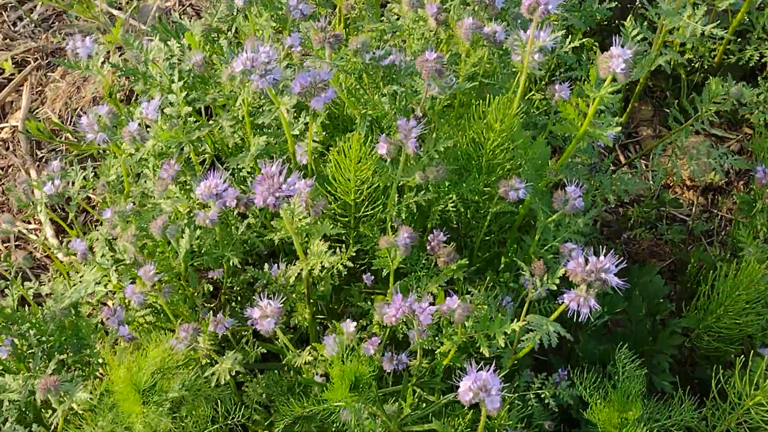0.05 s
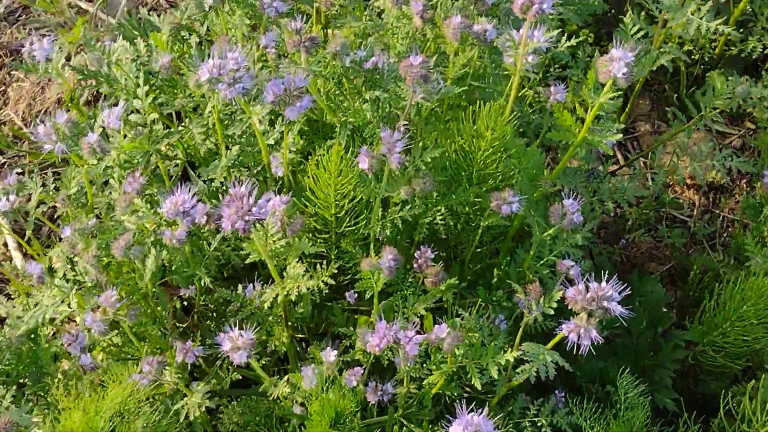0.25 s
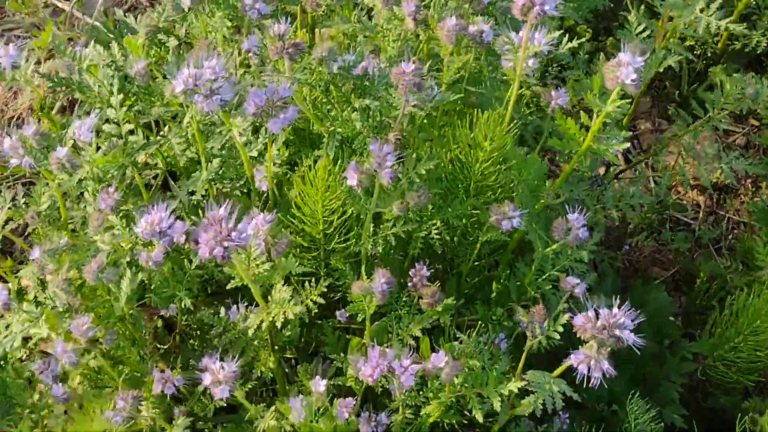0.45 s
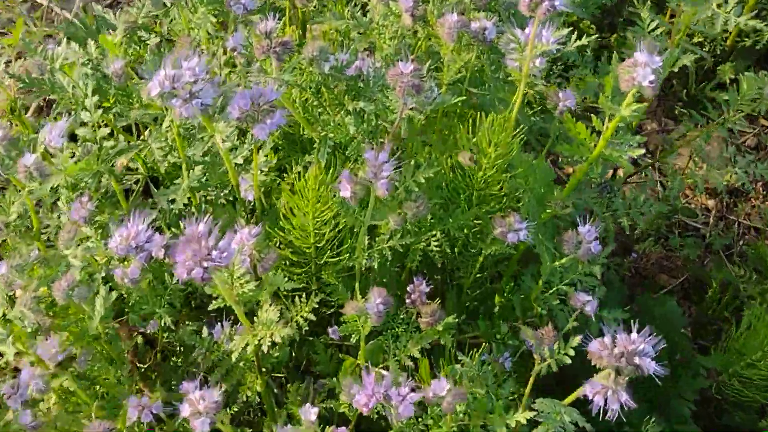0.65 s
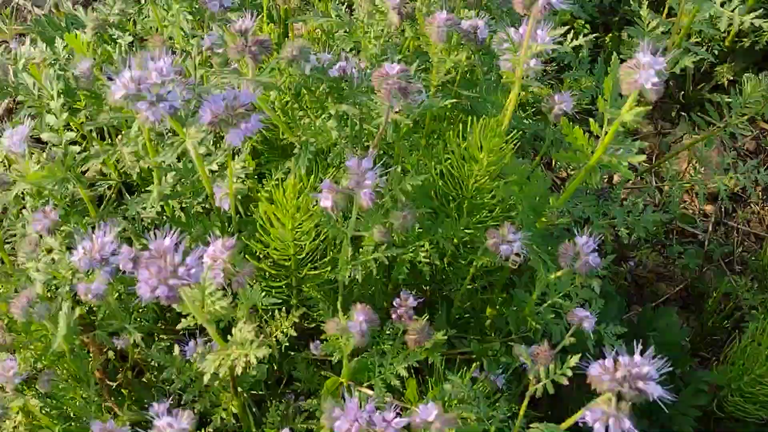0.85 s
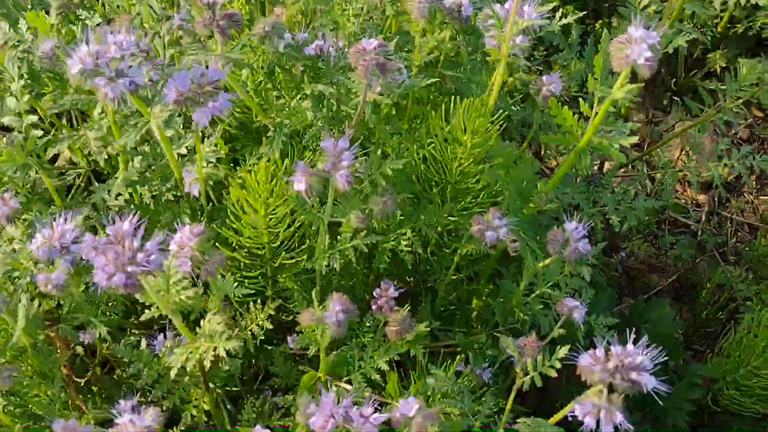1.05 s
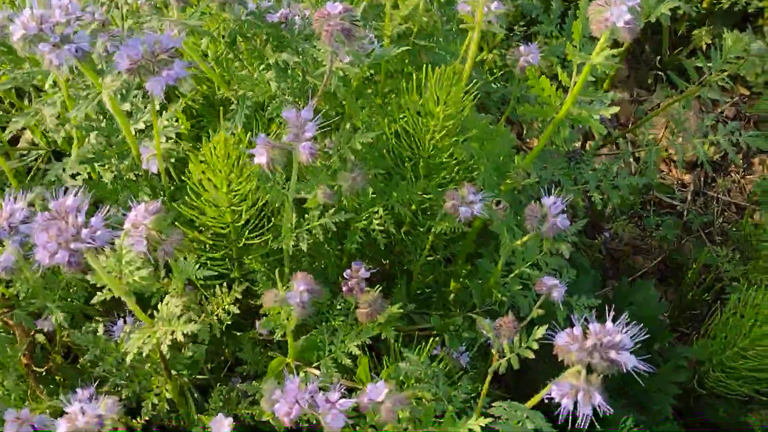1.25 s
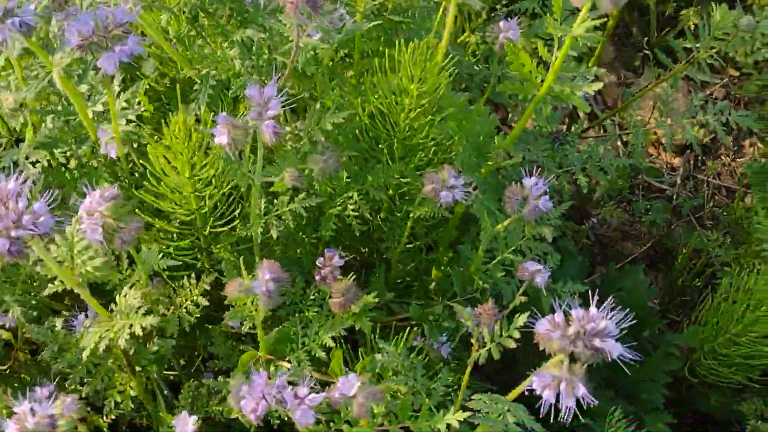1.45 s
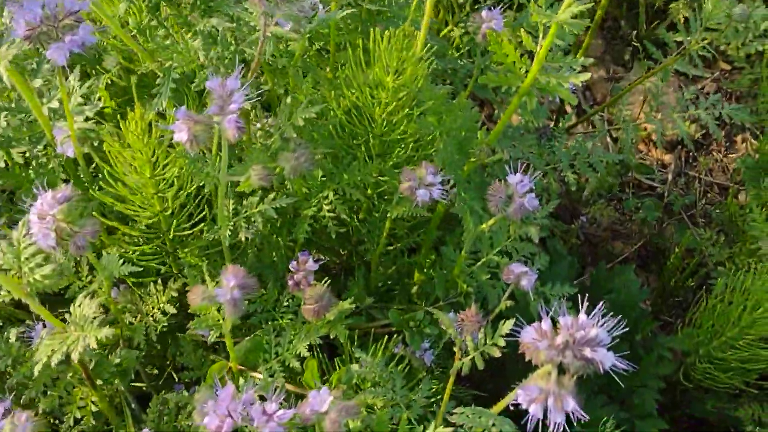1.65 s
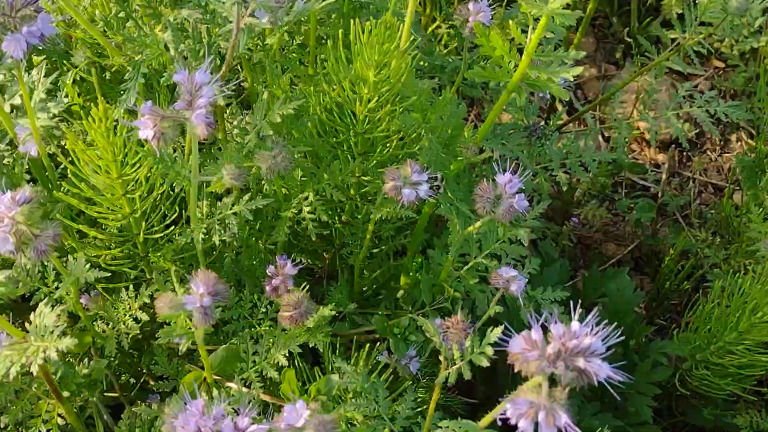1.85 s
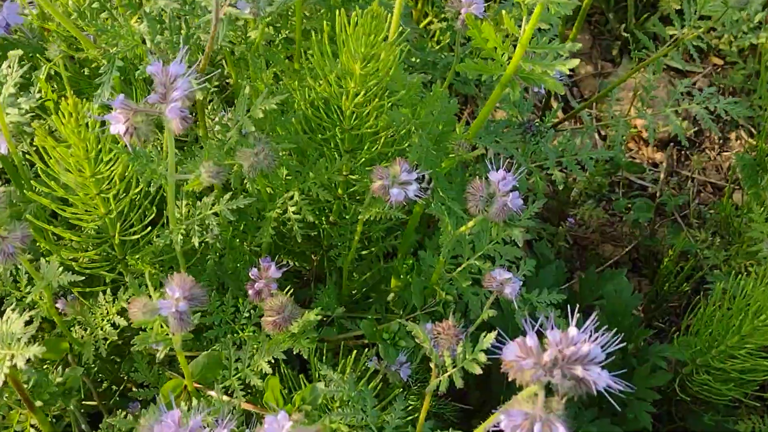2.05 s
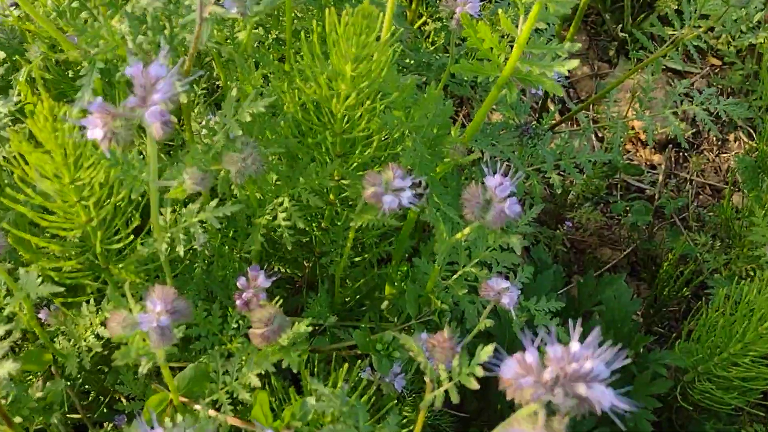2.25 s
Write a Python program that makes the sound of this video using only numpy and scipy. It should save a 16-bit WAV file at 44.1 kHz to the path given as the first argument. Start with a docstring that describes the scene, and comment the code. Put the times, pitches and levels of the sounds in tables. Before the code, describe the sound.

Faint bumblebee buzz among flowers, with sharp little ticks and a low microphone bump.

```python
"""A bumblebee's buzz hovers among garden flowers for about a second, then stops.
Its periodic wingbeat radiates a harmonic series and stirs the air; leaves scatter the tone.
Handling of a camera gives one low thump (a pressure step), small taps, soft rubbing (friction)
and sharp ticks (damped resonance of the right microphone port).
Behind it are a light rumble of air, a steady hiss and the whistles of a very distant bird."""
import sys
import numpy as np
from scipy import signal
from scipy.fft import rfft, irfft
from scipy.io import wavfile

SR = 44100
rng = np.random.default_rng(int(sys.argv[2]) if len(sys.argv) > 2 else 0)


def wav_record(signal):
    """Record a signal, one row per channel, as 16-bit PCM in the file named by sys.argv[1]."""
    frames = np.transpose(np.atleast_2d(signal))
    bounded = np.clip(frames, -1, 1)
    # unit amplitude maps onto the largest positive 16-bit level
    quanta = np.round(bounded * 32767).astype(np.int16)
    wavfile.write(sys.argv[1], SR, quanta)


N = 105840

# Levels are taken before later gains; spectra give relative density; balance is left minus right.
# wingbeat rate: t/s, f/Hz
WINGBEAT = [(0.34, 237.6), (0.366, 256.0), (0.408, 245.9), (0.426, 259.8), (0.448, 242.5), (0.472, 255.7),
            (0.526, 258.4), (0.586, 253.5), (0.64, 257.4), (0.682, 221.5), (0.696, 217.8), (0.784, 258.4),
            (0.836, 255.8), (0.85, 247.4), (0.926, 259.3), (1.052, 255.0), (1.07, 247.9), (1.11, 248.3),
            (1.122, 241.9), (1.17, 253.9), (1.194, 245.2), (1.208, 263.9), (1.256, 256.4), (1.284, 245.4),
            (1.31, 259.6), (1.368, 249.2), (1.406, 260), (1.42, 245)]
# buzz envelope: t/s, level of harmonic 2 (the hum)/dB, level of the other harmonics/dB
BUZZ_LEVELS = [(.32, -75, -77), (.38, -64, -68), (.44, -63, -69), (.49, -60, -67.5), (.522, -76, -71),
               (.55, -59, -67), (.645, -60, -67), (.70, -70, -72), (.785, -58.5, -68), (.83, -59.5, -68),
               (.86, -68, -70), (.93, -64, -68), (1.03, -73, -68), (1.10, -66, -69.5), (1.16, -74, -69),
               (1.23, -66.5, -70.5), (1.41, -67, -71)]
# harmonic series of the wings: harmonic number, level/dB
WING_HARMONICS = [(1, -5), (2, -1), (3, -10), (4, 1.5), (5, -9.5), (6, -2.5), (7, -6.5), (8, -8.5),
                  (9, -16), (10, -18), (11, -24)]
# spectrum of the air stirred by the wings: f/Hz, level/dB
WING_AIR_SPECTRUM = [(100, -10), (260, -8), (450, 13), (700, 9), (1200, 3), (2000, 4), (2600, -27),
                     (6000, -18.5)]
# spectrum of the shudder after the thump: f/Hz, level/dB
SHUDDER_SPECTRUM = [(10, 4.5), (30, -12.5), (55, -8.5), (100, -16), (160, -36.5), (300, -64), (1000, -93)]
# ticks: t/s, level/dB, ring f/Hz, relative lower ring/dB, relative crack/dB, balance/dB
TICKS = [(0.634, -33.5, 9800, -13, -3.5, -30), (0.69, -28.5, 9200, -11, -5.5, -51),
         (1.0638, -23, 10700, -12.5, -13.5, -39), (1.149, -47, 10340, -20, -4, -27),
         (1.6027, -21.5, 10180, -7.5, -10.5, -37), (1.7100, -26, 9860, -14, -7.5, -26)]
# spectrum of a tick's crack: f/Hz, level/dB
CRACK_SPECTRUM = [(200, 3), (2300, 1.5), (4000, 9), (8000, 4), (11800, 21.5), (14000, -1), (16000, -6)]
# creaks, taps and bumps of the grip: t/s, level/dB, centre f/Hz, width/octaves, decay/s, balance/dB
GRIP_TAPS = [(0.065, -52, 3750, 0.081, 0.0019, 21), (.0935, -45, 4450, 1.0, 0.0018, 3),
             (0.167, -52.5, 2533, 1.2, 0.0044, 9), (0.22, -57, 410, 3.8, 0.0017, -20),
             (0.226, -37.5, 11900, 0.42, 0.0011, -14), (0.445, -56.5, 142, 0.31, 0.014, 4),
             (0.489, -46, 54, 0.65, 0.0098, -3.5), (0.516, -46, 193, 0.4, 0.014, 1),
             (0.518, -39.5, 3600, 0.96, 0.0014, 3), (0.5194, -48, 1590, 0.16, 0.0019, 5),
             (0.623, -55.5, 172, 1.17, 0.061, 1.5), (0.6904, -35, 10200, 1.1, 0.00068, 15),
             (1.5534, -41.5, 6100, 2.6, 0.00059, 10), (1.554, -59, 176, 0.75, 0.0088, 8),
             (1.559, -52, 9000, 0.81, .003, 11), (1.948, -49, 12800, 2.1, 0.0034, 21),
             (2.031, -55.5, 1170, 2.4, 0.0038, -2), (2.119, -47, 39, 0.52, 0.038, -14.5)]
# crackles as the hand slips: t/s, level/dB
SLIP_CRACKLES = [(.0755, -46), (.165, -43.5), (.205, -43), (.368, -46), (.654, -44), (.803, -46),
                 (.914, -47), (.979, -50)]
# envelope of the rubbing hand: t/s, level/dB
RUB_LEVELS = [(.02, -64.5), (.06, -56.5), (.1, -58), (.18, -51), (.24, -57), (.29, -59), (.36, -60),
              (.42, -69.5), (.5, -65.5), (.57, -61), (.66, -60.5), (.73, -69), (.8, -61.5), (.95, -68.5),
              (1.15, -68.5), (1.3, -66), (1.5, -71), (2.4, -72.5)]
# spectrum of the rubbing at each port: f/Hz, left level/dB, right level/dB
RUB_SPECTRA = [(70.4, -14, -15), (199, -1, 6.5), (610, -0.5, -10.5), (2060, -10, -1.5), (3200, -9, -12.5),
               (5680, -13, -14), (8040, -5, -3), (9550, -16, 2.5), (11860, -14.5, -3.5), (14500, -15, -11),
               (17000, -19, -10)]
# spectrum of the garden air: f/Hz, level/dB
AIR_SPECTRUM = [(15, -2.5), (25, 5.5), (33, -8.5), (92, -13.5), (206, -21.5), (236, -22.5), (326, -25.5),
                (503, -27), (734, -30.5), (1520, -36), (7310, -39.5), (14000, -42.5), (16000, -44.5)]
# likeness of the air noise at the two ports: f/Hz, correlation (0 to 1)
PORT_CORRELATION = [(30, 1), (150, 0), (600, 0.55), (1500, 0), (3000, 0), (16000, 0)]
# envelope of the hiss: t/s, level/dB
HISS_LEVELS = [(.05, -6.5), (.2, 4), (.7, 5), (1.1, 3), (1.48, 2), (1.62, 4.5), (1.93, 6), (2.07, -0.5),
               (2.15, 4.5), (2.4, 3.5)]
# envelope of the low rumble: t/s, level/dB
RUMBLE_LEVELS = [(.1, 0), (.82, 2), (.92, 3), (1.07, 0), (1.16, 4.5), (1.3, 0), (1.62, 3), (1.74, -0.5),
                 (1.82, 1.5), (1.94, 1), (2.14, 2), (2.4, 1)]
# bird notes: t/s, duration/s, start f/Hz, middle f/Hz, end f/Hz, level/dB
BIRD_NOTES = [(1.935, 0.094, 4150, 4400, 4360, -81), (2.013, 0.15, 4360, 4660, 4680, -82),
              (2.093, 0.029, 3830, 3740, 3720, -76), (2.12, 0.054, 4720, 4520, 5000, -78),
              (2.174, 0.11, 3850, 4050, 4070, -82)]

PORT_LAG_S, CRACK_DECAY_S = 0.00022, 0.00074
TIME, FREQS = np.arange(N) / SR, np.fft.rfftfreq(N, 1 / SR)


def bee():
    """Periodic forcing: beating wings radiate harmonics of their rate and stir the air into noise."""
    start_s, end_s, fade_s, pivot_s = 0.28, 1.43, 0.0062, 1.0
    nearing_db_per_s, turning_db_per_s = 20, 6
    effort_db_per_hz, hover_hz = 0.13, 255
    jitter, flutter_db = .005, 1.5
    flying = np.clip(np.minimum(TIME - start_s, end_s - TIME) / fade_s, 0, 1)
    rate = curve(WINGBEAT)
    cycles = np.cumsum(rate * (1 + jitter * wander(hz=62.6))) / SR
    hum = flying * amp(curve(BUZZ_LEVELS))
    others = flying * amp(curve(BUZZ_LEVELS, column=2))
    buzz = np.zeros((2, N))
    for k, db in WING_HARMONICS:
        level = hum * amp(db) if k == 2 else others * amp(db + flutter_db * wander(hz=22))
        if k == 1:  # the fundamental grows as the bee nears
            level *= amp(nearing_db_per_s * (TIME - pivot_s))
        elif k > 3:  # even harmonics gain on odd ones as it turns
            level *= amp((-1) ** k * turning_db_per_s * (TIME - pivot_s))
        sides = pan(db=-4 if k > 2 else -4.5)
        buzz += sides * np.sqrt(2) * level * np.sin(2 * np.pi * (k * cycles + rng.random()))
    buzz *= amp(effort_db_per_hz * (rate - hover_hz))  # faster wingbeats are louder
    scattered = leaf_scatter(buzz)
    shared, left, right = (noise(WING_AIR_SPECTRUM) for _ in range(3))
    stirred = others * amp(-0.5) * (shared + .5 * np.array([left, right]))
    return buzz + scattered + stirred


def leaf_scatter(buzz, t60_s=0.1, level_db=-14):
    """Diffuse scattering: reflections from leaves add a short, exponentially decaying tail."""
    response = rng.standard_normal((2, N)) * np.exp(-np.log(1000) * TIME / t60_s)
    response /= np.linalg.norm(response[0])
    return amp(level_db) * signal.fftconvolve(buzz, response, axes=1)[:, :N]


def thump(onset_s=.2212):
    """Relaxation: pressure at both ports steps down, swells back and leaks away as a shudder dies."""
    step_db, swell_db, swell_s, leak_s = -22.5, -8, 0.06, 0.2
    shudder_db, shudder_s = -45.5, 0.41
    settling = np.exp(-TIME / swell_s)
    pressure = amp(swell_db) * (np.exp(-TIME / leak_s) - settling) - amp(step_db) * settling
    envelope = amp(shudder_db) * np.exp(-(TIME / shudder_s) ** 4)
    shared = noise(SHUDDER_SPECTRUM)
    out = np.zeros((2, N))
    for port, lag in zip(out, (0, PORT_LAG_S)):
        shudder = envelope * (shared + 1.03 * noise(SHUDDER_SPECTRUM))
        add(port, onset_s + lag, pressure + shudder)
    return out


def ticks(rise_s=0.00013, lower_hz=6600):
    """Damped resonance: tiny snaps crack and ring two modes of the port for under a millisecond."""
    t, out = np.arange(512) / SR, np.zeros((2, N))
    envelope = (t / rise_s / 2) ** 2 * np.exp(2 - t / rise_s)
    for onset, db, hz, lower_db, crack_db, balance_db in TICKS:
        ring = envelope * (np.sin(2 * np.pi * hz * t) + amp(lower_db) * np.sin(2 * np.pi * lower_hz * t))
        crack = amp(crack_db) * noise(CRACK_SPECTRUM, len(t)) * np.exp(-t / CRACK_DECAY_S)
        add(out, onset, amp(db) * pan(balance_db) * (ring + crack))
    return out


def grip_taps(size=8192):
    """Impulsive excitation: the grip sets off damped bands of noise, slightly later on the right."""
    t, f = np.arange(size) / SR, np.fft.rfftfreq(size, 1 / SR) + 1
    out = np.zeros((2, N))
    for onset, db, hz, octaves, decay_s, balance_db in GRIP_TAPS:
        spectra = rfft(rng.standard_normal((2, size)))
        spectra[1] = spectra[0] * np.exp(-2j * np.pi * f * PORT_LAG_S / 2)
        band = np.exp(-.5 * (np.log2(f / hz) / octaves) ** 2)
        burst = unit(irfft(spectra * band))
        envelope = (1 - np.exp(-2 * t * hz)) * np.exp(-t / decay_s)
        add(out, onset, amp(db) * pan(balance_db) * burst * envelope)
    return out


def rubbing(grain_db=1.5, slip_db=2.5):
    """Friction: a slipping hand hisses and crackles, brightest in the resonance of the right port."""
    grains = rng.standard_normal((2, N)) * amp(grain_db * wander(hz=395) + slip_db * wander(hz=21))
    friction = amp(curve(RUB_LEVELS)) * unit(grains)
    decay = np.exp(-np.arange(512) / SR / CRACK_DECAY_S)
    for onset, db in SLIP_CRACKLES:
        add(friction, onset, amp(db) * rng.standard_normal((2, len(decay))) * decay)
    colour = amp([at_bins(RUB_SPECTRA), at_bins(RUB_SPECTRA, column=2)])
    return irfft(rfft(friction) * unit(colour), N)


def air(level_db=-59.5, crossover_hz=3000):
    """Partial coherence: the deepest rumble is common to both ports, the high hiss independent."""
    left, independent = rfft(rng.standard_normal((2, N)))
    correlation = np.clip(at_bins(PORT_CORRELATION), 0, 1)
    right = correlation * left + np.sqrt(1 - correlation ** 2) * independent
    spectra = np.array([left, right]) * amp(at_bins(AIR_SPECTRUM)) * (FREQS > 20)
    highpass = FREQS ** 2 / (FREQS ** 2 + crossover_hz ** 2)
    rumble, hiss = irfft(spectra * (1 - highpass), N), irfft(spectra * highpass, N)
    wavering = rumble * amp(curve(RUMBLE_LEVELS)) + hiss * amp(curve(HISS_LEVELS)) * pan(db=0.99)
    return amp(level_db) * wavering / np.std(rumble + hiss)


def bird():
    """Frequency modulation: thin whistles, far to the left, glide along parabolas of pitch."""
    out = np.zeros(N)
    for onset, duration, first, middle, last, db in BIRD_NOTES:
        progress = np.linspace(0, 1, int(duration * SR))
        hz = np.polyval(np.polyfit([0, .5, 1], [first, middle, last], 2), progress)
        envelope = np.sqrt(2 * abs(np.sin(np.pi * progress)))
        add(out, onset, amp(db) * envelope * np.sin(2 * np.pi * np.cumsum(hz) / SR))
    return pan(db=8.7) * out


def amp(db):
    """Decibel law: amplitude grows tenfold per 20 dB."""
    return 10 ** (np.asarray(db) / 20)


def unit(x):
    """Normalisation to rms 1."""
    return x / np.sqrt(np.mean(x ** 2) + 1e-30)


def curve(rows, column=1):
    """Linear interpolation of a time table at every sample."""
    rows = np.array(rows)
    return np.interp(TIME, rows[:, 0], rows[:, column])


def at_bins(rows, size=N, column=1):
    """Log-frequency interpolation of a table at the Fourier bins of a sound of this size."""
    rows = np.array(rows)
    return np.interp(np.log(np.fft.rfftfreq(size, 1 / SR) + 1), np.log(rows[:, 0]), rows[:, column])


def noise(spectrum, size=N):
    """Spectral shaping of white noise, at rms 1."""
    return unit(irfft(rfft(rng.standard_normal(size)) * amp(at_bins(spectrum, size)), size))


def wander(hz):
    """Random modulation: noise of rms 1, low-passed at this rate."""
    return unit(irfft(rfft(rng.standard_normal(N)) / (1 + (FREQS / hz) ** 4), N))


def pan(db):
    """Level difference between left and right as two gains; positive favours the left."""
    return amp([[min(db, 0)], [min(-db, 0)]])


def add(mix, onset_s, sound):
    """Superposition of a delayed sound on the mix."""
    part = mix[..., max(round(onset_s * SR), 0):][..., :sound.shape[-1]]
    part += sound[..., :part.shape[-1]]


def scene():
    """Superposition: the pressures of bee, handling and garden add."""
    return bee() + thump() + ticks() + grip_taps() + rubbing() + air() + bird()


def record(dry, fade_s=.016, cutoff_hz=16000):
    """Band limiting: the sound fades in quickly from silence; a low-pass cuts the top treble."""
    fade_in = np.clip(TIME / fade_s, 0, 1) ** 10
    lowpass = signal.firwin(401, cutoff_hz, window=("kaiser", 9), fs=SR)
    return signal.oaconvolve(dry * fade_in, lowpass[None], "same")


dry = scene()
out = record(dry)
wav_record(out)
```